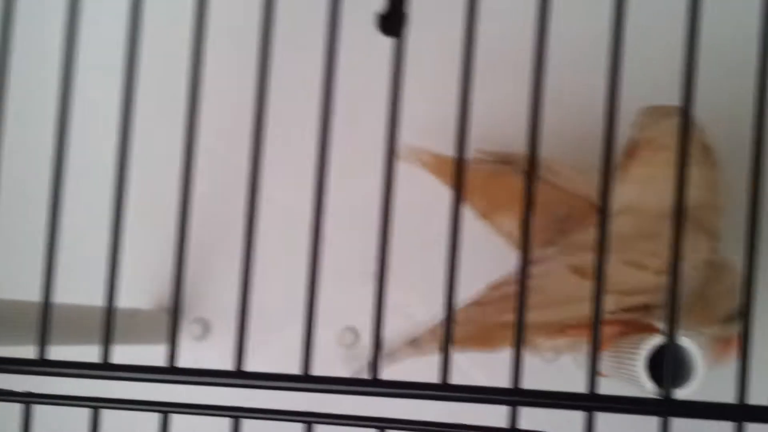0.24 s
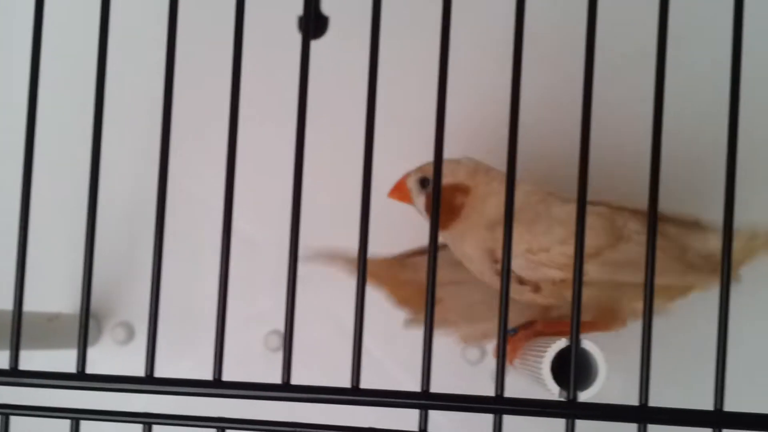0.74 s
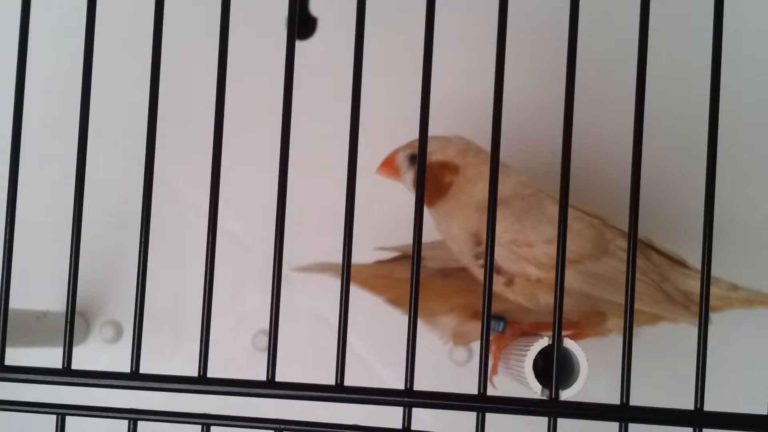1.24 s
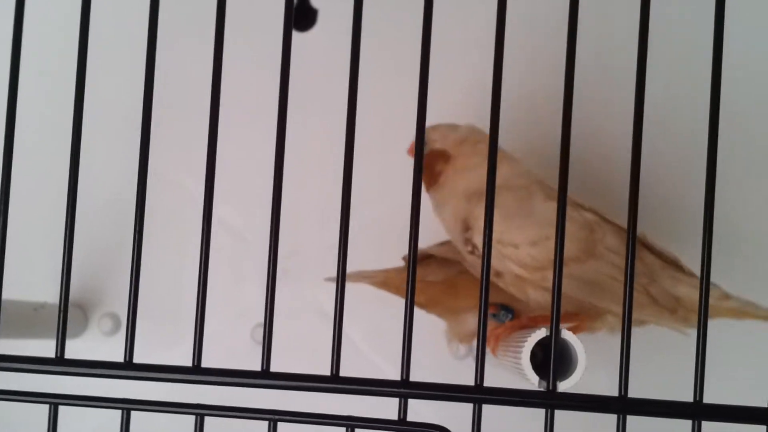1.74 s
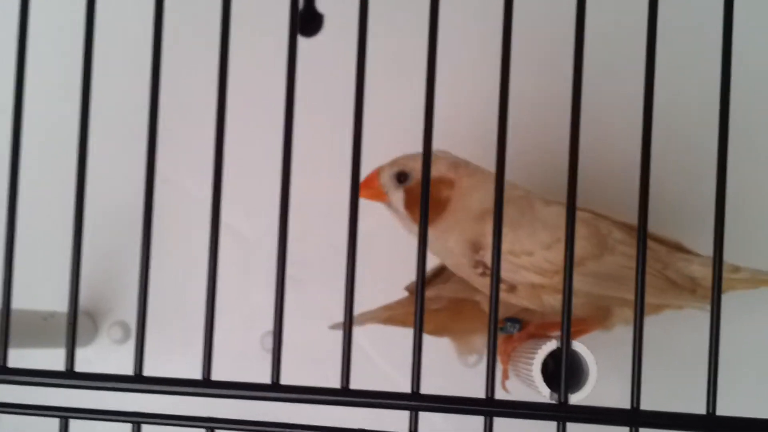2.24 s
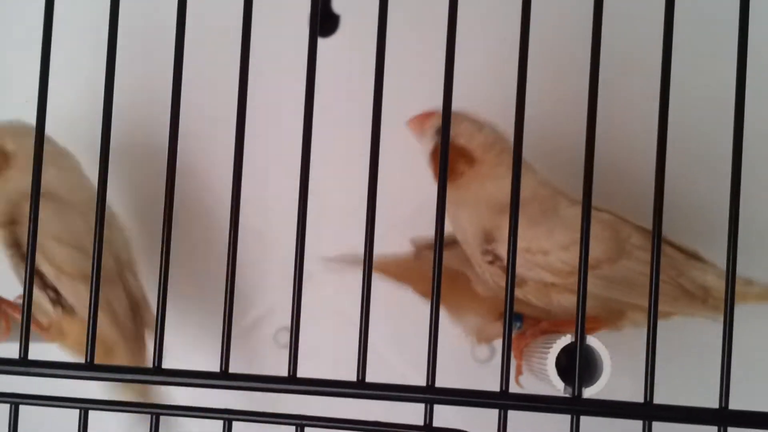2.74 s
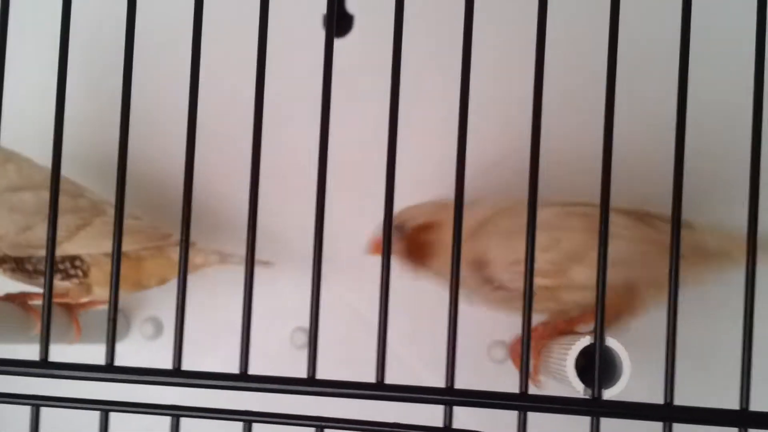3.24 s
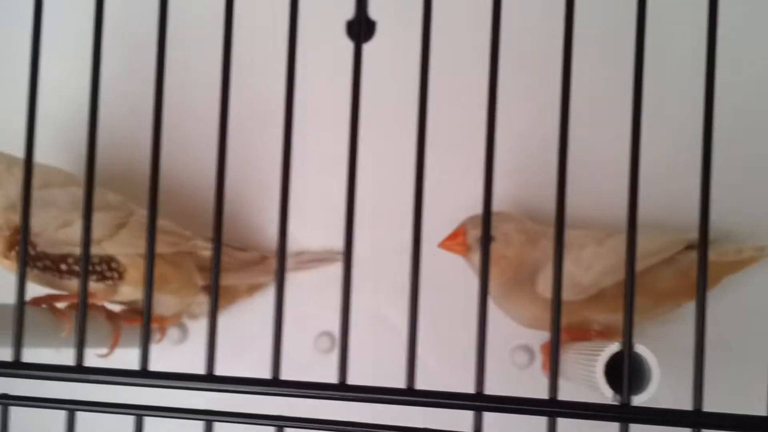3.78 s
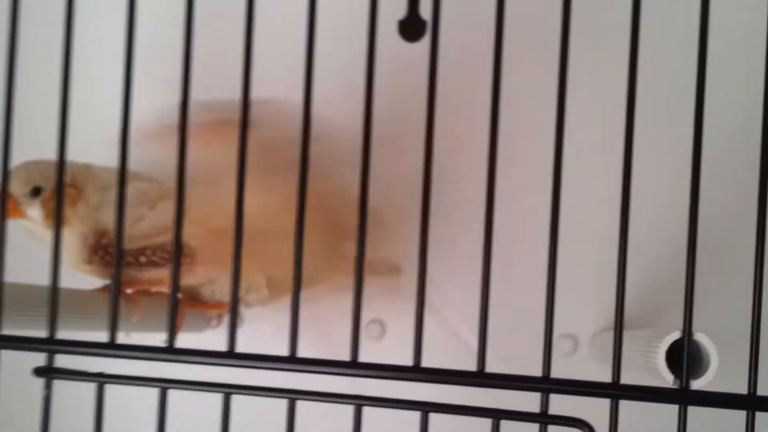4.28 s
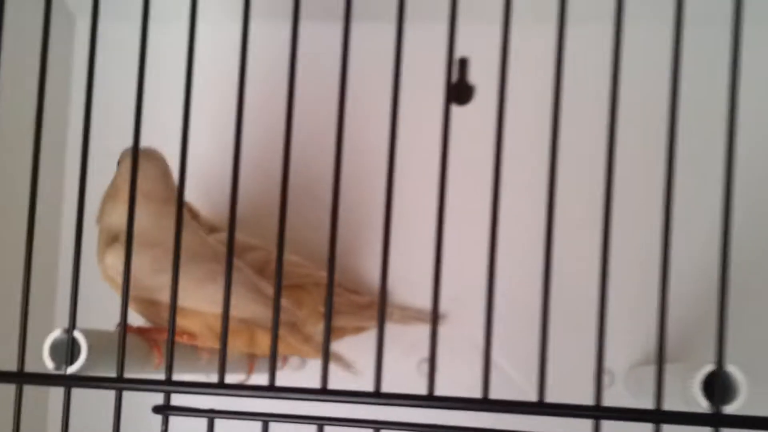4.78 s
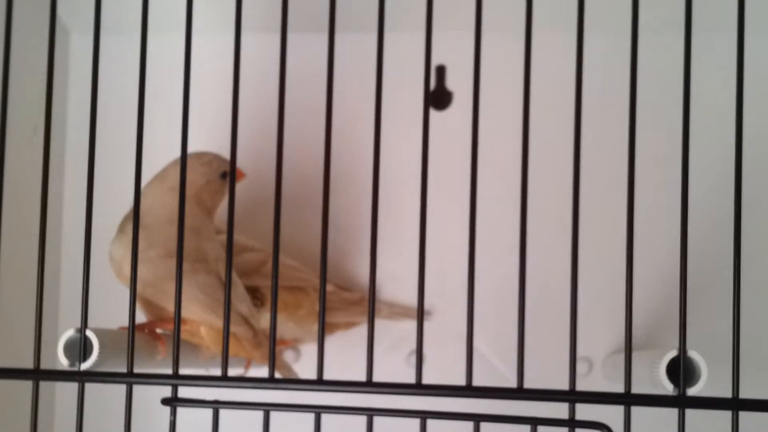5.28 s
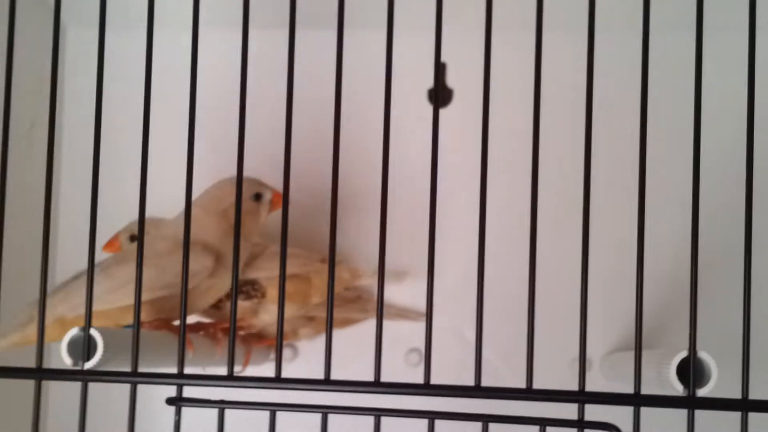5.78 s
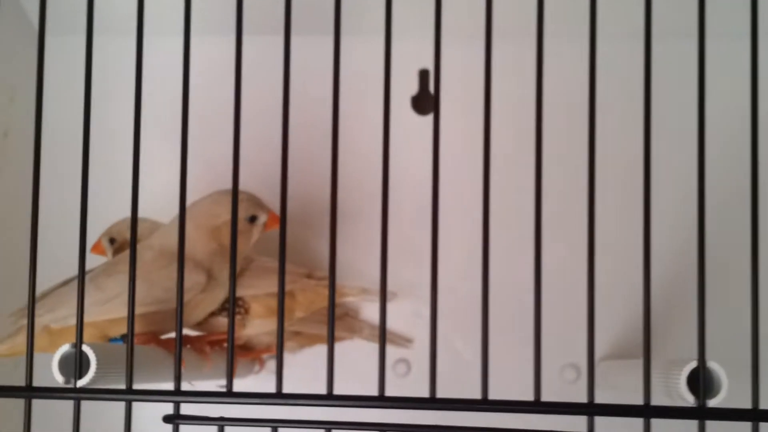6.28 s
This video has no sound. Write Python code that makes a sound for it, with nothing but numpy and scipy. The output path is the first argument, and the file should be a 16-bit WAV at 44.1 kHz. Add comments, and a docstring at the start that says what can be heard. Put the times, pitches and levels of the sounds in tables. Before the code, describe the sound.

Small finches trade buzzy nasal calls and short high chirps in a wire cage indoors, ending with a run of louder, purer chirps.

```python
"""A wire cage of zebra finches in a small room, the microphone close to the birds.
From the start an appliance hums low under the room's rush, while hops bump the perches and claws tick the wires.
Nasal harmonic calls and raspy high chirps, each voiced by a modelled syrinx, soon chatter across one another.
A two-part falling yelp breaks in at 1.3 s; another follows at 4.4 s, as a bird lands with a thud.
The strongest chirps come after 5.4 s, ringing purer than the rest."""
import sys
import numpy as np
from scipy import signal
from scipy.fft import rfft, irfft, next_fast_len
from scipy.io import wavfile
from scipy.ndimage import map_coordinates

SR = 44100
rng = np.random.default_rng(int(sys.argv[2]) if len(sys.argv) > 2 else 0)


def bounce(signal):
    """Save signal as a 16-bit WAV file at the path given by the first command-line argument."""
    frames = np.transpose(np.atleast_2d(signal))
    limited = np.clip(frames, -1, 1)
    pcm = np.round(limited * 32767).astype(np.int16)
    wavfile.write(sys.argv[1], SR, pcm)


N = 287532


def amp(db):
    """Decibels to gain."""
    return 10 ** (np.asarray(db) / 20)


def unit(x):
    """Scale to rms 1."""
    return x / np.sqrt(np.mean(x ** 2) + 1e-20)


def along(points, hz):
    """Read (Hz, value) points on a log axis."""
    point_hz, values = np.transpose(points)
    return np.interp(np.log(hz + 1), np.log(point_hz + 1), values)


def clock(length):
    """Sample times over a length in seconds."""
    return np.arange(int(length * SR)) / SR


def wobble(rate, t):
    """A smooth random curve over the times t, rate knots a second."""
    knots = rng.standard_normal(int(t[-1] * rate) + 4)
    return map_coordinates(knots, [t * rate + 1])


def cycles(hz):
    """Running phase in radians of a changing frequency."""
    return 2 * np.pi * np.cumsum(hz) / SR


def filtered(x, gain):
    """x through a gain that depends on frequency."""
    size = next_fast_len(len(x) + 2048)
    spectrum = rfft(x, size) * gain(np.fft.rfftfreq(size, 1 / SR))
    return irfft(spectrum, size)[:len(x)]


def coloured(x, points, tilt_db=0):
    """x through a (Hz, dB) spectrum, tilted by dB per octave above 2 kHz, at rms 1."""
    def gain(hz):
        octaves = np.log2(np.maximum(hz / 2000, 1))
        return amp(along(points, hz) + tilt_db * octaves)
    return unit(filtered(x, gain))


def swell(t, rise, fall):
    """Smooth opening and closing of a sound, over rise and fall seconds."""
    opening = np.sin(np.pi / 2 * np.clip(t / rise, 0, 1)) ** 2
    closing = np.sin(np.pi / 2 * np.clip((t[-1] - t) / fall, 0, 1)) ** 2
    return opening * closing


def arch(u, first, top, last, crest):
    """Pitch climbs to its top, reached at the share crest of the call, and sags again."""
    climb = (first - top) * np.clip(1 - u / crest, 0, 1) ** 2
    sag = (last - top) * np.clip((u - crest) / (1 - crest), 0, 1) ** 2
    return top + climb + sag


def add(track, s, x):
    """Mix x into the track at time s."""
    part = track[max(round(s * SR), 0):][:len(x)]
    part += x[:len(part)]


def ring(modes, t, spread_db):
    """Damped modes, struck at new strengths each time."""
    total = 0
    for hz, db, t60 in modes:
        strength = amp(db + spread_db * rng.standard_normal() - 60 * t / t60)
        total = total + strength * np.sin(2 * np.pi * (hz * t + rng.random()))
    return total


# how long the small room rings: (frequency [Hz], t60 [s])
ROOM = [(300, 0.7), (2500, 0.23), (6000, 0.14), (11000, 0.51)]


def room(x, near_db, far_db, near_t60=0.11):
    """Direct sound, quick echoes off the wall behind the cage and the room's tail, new for each sound."""
    t = clock(.35)
    hz, lag, z = signal.stft(rng.standard_normal(len(t)), SR, nperseg=256)
    decay = amp(-60 * lag / along(ROOM, hz)[:, None])
    tail = signal.istft(z * decay, SR, nperseg=256)[1][:len(t)] * (t > .006)
    sparse = rng.standard_normal(len(t)) * (rng.random(len(t)) < .02)
    near = sparse * amp(-60 * t / near_t60) * (t > .001)
    echoes = amp(near_db) * near / np.linalg.norm(near) + amp(far_db) * tail / np.linalg.norm(tail)
    echoes[0] = 1  # straight from source to microphone
    return signal.fftconvolve(x, echoes / np.linalg.norm(echoes))


# hum of the appliance: (time [s], fundamental level [dB], second harmonic level [dB])
HUM = [(0, -53, -65), (1, -52, -50.5), (2, -56, -56.5), (2.801, -49, -48), (3.7, -46, -50),
       (4.4, -52.5, -56.5), (4.9, -57, -46.5), (6.5, -49.5, -52.5)]


def appliance_hum(hum_hz=39.4):
    """Four harmonics of a low hum, wavering together in pitch and each in level and phase."""
    t = np.arange(N) / SR
    s, first_db, second_db = np.transpose(HUM)
    levels = [np.interp(t, s, first_db), np.interp(t, s, second_db), -56, -63]
    phase = cycles(hum_hz * (1 + 0.017 * wobble(1.3, t)))
    hum = np.zeros(N)
    for k, db in enumerate(levels, 1):
        hum += amp(db + 1.3 * wobble(5, t)) * unit(np.sin(k * phase + .5 * wobble(9, t)))
    return hum


# spectrum of the room's soft rush: (frequency [Hz], relative level [dB per Hz])
AIR = [(12, -25), (20, -25), (99, -2.5), (225, -9.5), (486, -11), (555, -13.5), (1080, -17), (1990, -24),
       (2740, -29.5), (3870, -29), (6080, -24), (11500, -33), (15000, -88), (22000, -120)]


def room_rush():
    """Coloured noise for the air of the room, drifting slightly in level."""
    drift = amp(.9 * wobble(3, np.arange(N) / SR))
    return amp(-49) * drift * coloured(rng.standard_normal(N), AIR)


# soft bumps on perch and cage floor: (time [s], relative level [dB])
BUMPS = [(0.323, -31), (0.708, -28), (0.981, -29), (1.18, -32.5), (1.485, -36), (1.771, -27), (2.665, -28),
         (3.163, -30), (3.222, -33), (3.434, -24), (4.217, -32), (4.314, -28.5), (5.578, -25.5),
         (5.641, -26.5)]
# ringing modes of a perch: (frequency [Hz], relative level [dB], t60 [s])
PERCH = [(285.4, -9.5, 0.44), (336.3, -2.5, 0.34), (382, 3, 0.12), (449.6, 3, .15)]


def perch_bumps():
    """Feet set the perch modes ringing, with a soft onset."""
    out, t = np.zeros(N), clock(0.36)
    for s, db in BUMPS:
        contact = 1 - np.exp(-t / 0.0042)
        add(out, s, amp(db - 9.5) * ring(PERCH, t, spread_db=2) * contact)
    return out


# claws and beaks on the cage: (time [s], tray knock level [dB], wire tick level [dB])
TAPS = [(.014, -40.5, -28), (.123, -50, -36.5), (.982, -23.5, -32), (1.177, -36.5, -23), (1.481, -44, -26),
        (1.768, -35, -39.5), (2.699, -34, -37), (3.115, -37, -26), (3.365, -45, -38), (3.416, -37.5, -32.5),
        (4.158, -43, -60), (4.313, -36.5, -38), (4.423, -39, -59)]
# ringing modes of the plastic tray: (frequency [Hz], relative level [dB], t60 [s])
TRAY = [(282, -10.5, 0.59), (600, -9, 0.082), (1270, -3, 0.06), (1517, -17.5, 0.065), (1935, -8.5, 0.059)]
# colour of the wire ticks: (frequency [Hz], relative level [dB])
WIRES = [(800, -7), (2000, -4), (3500, -3), (6200, 3), (9000, -11.5), (12000, -13)]


def cage_taps():
    """Claws rattle on the wires as decaying noise and knock the plastic tray's damped modes."""
    out, t = np.zeros(N), clock(0.36)
    for s, knock_db, tick_db in TAPS:
        # a claw skids and catches several times
        chatter = amp(2.5 * wobble(350, t))
        tick = coloured(rng.standard_normal(len(t)), WIRES) * chatter * amp(-60 * t / 0.11)
        dull = [(250, -9), (1400, -4), (2300, -13), (5000, -60)]  # (frequency [Hz], level [dB])
        thud = coloured(rng.standard_normal(len(t)), dull) * amp(-60 * t / 0.17)
        knock = 1.32 * ring(TRAY, t, spread_db=1.5) + .5 * thud
        contact = 1 - np.exp(-t / .005)
        tap = (amp(tick_db) * tick + amp(knock_db) * knock) * contact
        add(out, s, room(tap, near_db=-18.5, far_db=-10.5))
    return out


LANDING_S = 4.421
# thud of a bird landing: (frequency [Hz], level [dB], t60 [s])
LANDING = (257, -23, 0.057)


def landing():
    """One damped low mode: a bird's weight meeting the cage."""
    out, t = np.zeros(N), clock(0.36)
    hz, db, t60 = LANDING
    add(out, LANDING_S, amp(db) * np.sin(2 * np.pi * hz * t) * amp(-60 * t / t60))
    return out


def syrinx(pitch, rough, t, flicker_db=3):
    """One puff a cycle; roughness unsettles pitch and size and lets air hiss through each opening."""
    jitter, shimmer_db, smear = .035, 6, 0.23
    phase = cycles(pitch * (1 + jitter * rough * wobble(356.5, t)))
    # the airway smears each puff in time, and the overtones flicker as beak and head move
    puffs = np.zeros(len(t))
    for k in range(1, 23):
        flicker = amp(flicker_db * wobble(40, t))
        puffs += flicker * np.cos(k * phase - smear * k * k + 0.29 * wobble(58.2, t))
    hiss = unit(rng.standard_normal(len(t)) * (1 + 0.55 * np.cos(phase)))
    return unit(puffs) * amp(shimmer_db * rough * wobble(311, t)) + rough * hiss


# first and last pitch over the top pitch; share of the call spent climbing
NASAL_FIRST, NASAL_LAST, NASAL_CREST = .88, .93, .46
# roughness 0-1 once settled, extra at the start, time to settle [s]
NASAL_ROUGH, HOARSE_ONSET, HOARSE_S = .17, .38, .025
# middle over ends [dB]; share of the call spent swelling; release [s]
NASAL_ARCH_DB, NASAL_RISE, NASAL_RELEASE_S = 4.1, .12, .019
# nasal calls: (start [s], length [s], top pitch [Hz], relative level [dB], beak opening as brightness [dB])
NASAL = [(.056, .074, 566, -34.5, -8.5), (.635, .086, 574, -32, -8), (.892, .08, 531, -34.5, -2.5),
         (1.17, .097, 569, -27, -5), (1.233, .125, 619, -22, 1.5), (1.595, .133, 538, -32.5, 1),
         (1.797, .112, 552, -35.5, 3.5), (2.09, .18, 617, -23.5, 1), (3.03, .07, 520, -50, -6),
         (3.23, .075, 547, -38.5, -6), (3.742, .074, 529, -33, -8.5), (3.922, .145, 613, -22.5, 0),
         (3.994, .098, 596, -20.5, -2.5), (4.51, .195, 589, -25, -.5), (4.675, .105, 536, -36.5, -1.5),
         (4.977, .112, 549, -42, -7), (5.247, .1, 535, -36.5, -3.5), (5.403, .105, 587, -28, 6),
         (5.586, .185, 614, -21.5, 2), (5.768, .12, 589, -31.5, 3.5), (6.09, .2, 613, -26, 1),
         (6.42, .165, 587, -36, 4)]
# throat and beak in a nasal call: (frequency [Hz], relative level [dB])
NASAL_THROAT = [(550, -29.5), (1150, -18), (1750, -18.5), (2350, -11.5), (3000, 0), (3600, -4.5), (4200, 1),
                (4900, -7.5), (5800, -12), (7500, -23), (10000, -24.5), (12000, -47)]


def nasal_calls():
    """Buzzy harmonic calls on one shallow arch of pitch, hoarse as the voice starts, then cleaner."""
    out = np.zeros(N)
    for s, length, top, db, bright_db in NASAL:
        t = clock(length)
        u = t / length
        unsteady = 1 + .0034 * wobble(69.4, t)
        pitch = top * arch(u, NASAL_FIRST, 1, NASAL_LAST, NASAL_CREST) * unsteady
        hoarse = NASAL_ROUGH + HOARSE_ONSET * np.exp(-t / HOARSE_S)
        throat = np.array(NASAL_THROAT) * [2 ** (bright_db / 40), 1]  # a closing beak lowers the resonances
        voice = coloured(syrinx(pitch, hoarse, t), throat, bright_db / 2)
        effort = swell(t, NASAL_RISE * length, NASAL_RELEASE_S) * amp(-NASAL_ARCH_DB * (2 * u - 1) ** 2)
        add(out, s, room(amp(db + .5) * voice * effort, near_db=-1.5, far_db=-19))
    return out


# high note held [s]; time [s], pitch [Hz] and level [dB] of the fall
YELP_HOLD_S, TUMBLE_S, TUMBLE_HZ, TUMBLE_DB = .011, .042, 440, 12
# yelps: (start [s], top pitch [Hz], level [dB], beak opening as brightness [dB per octave])
YELPS = [(1.308, 943, -10.5, -.5), (4.424, 918, -12, 3.5)]
# the two syllables of every yelp: (delay [s], length [s])
SYLLABLES = [(0, .052), (.053, .084)]
# throat and beak in a yelp: (frequency [Hz], relative level [dB])
YELP_THROAT = [(500, -30.5), (900, -21), (1800, -21.5), (2700, -11.5), (3650, -0.5), (4500, -7.5),
               (5400, -4), (6400, -21), (8000, -32.5), (12000, -41)]


def yelps():
    """Each syllable holds a high loud pitch, then tumbles, weaker and rougher; the longer falls further."""
    out = np.zeros(N)
    for s, top, db, bright_db in YELPS:
        for delay, length in SYLLABLES:
            t = clock(length)
            tumble = 1 - np.exp(-(np.maximum(t - YELP_HOLD_S, 0) / TUMBLE_S) ** 1.3)
            scoop = 1 - .052 * np.exp(-t / .004)  # starts slightly flat
            pitch = (top - TUMBLE_HZ * tumble) * scoop
            voice = coloured(syrinx(pitch, .13 + .067 * tumble, t, flicker_db=4), YELP_THROAT, bright_db)
            effort = swell(t, rise=.0094, fall=.012) * amp(-TUMBLE_DB * tumble ** .4)
            add(out, s + delay, room(amp(db) * voice * effort, near_db=-4, far_db=-13))
    return out


# top pitch of a full chirp [Hz]; one clipped short stays higher by up to this share; length scale [s]
CHIRP_HZ, CLIPPED_LIFT, CLIPPED_S = 2900, .38, .043
# first and last pitch over the top; share of the call spent climbing; share of pitch lost in the slide
CHIRP_FIRST, CHIRP_LAST, CHIRP_CREST, CHIRP_SLIDE = .86, .96, .36, .125
# middle over ends [dB]; attack [s]; release [s]
CHIRP_ARCH_DB, CHIRP_RISE_S, CHIRP_RELEASE_S = 16, .018, .006
# rasp 0-1 at this table level [dB]: a chirp pushed harder is purer
RASP, RASP_AT_DB, CLEARS_PER_DB = .8, -25, .012
# share of the rasp added at the start, share that stays; time until the tone clears [s]
SHRED_ONSET, SHRED_SETTLED, CLEAR_S = .85, .5, .032
# chirps: (start [s], length [s], relative level [dB], second harmonic over the first [dB])
CHIRPS = [(.225, .078, -26.5, -1), (.591, .08, -25.5, 1.5), (1.124, .038, -42, -9), (1.486, .066, -27, 3.5),
          (1.526, .068, -27.5, 4.5), (1.874, .052, -34.5, -10), (1.939, .072, -23.5, -5.5),
          (2.259, .029, -23.5, -3.5), (2.455, .083, -23, -2.5), (2.549, .058, -37, -9),
          (2.913, .05, -30, -4.5), (3.265, .052, -25, -7), (3.879, .061, -24.5, 6.5),
          (4.566, .062, -27, -19), (4.807, .053, -32, -8.5), (5.014, .06, -32.5, 7),
          (5.089, .054, -34.5, -9), (5.348, .064, -32.5, -3.5), (5.464, .072, -12.5, 11.5),
          (5.692, .063, -16, 6.5), (5.906, .098, -12.5, 12.5), (6.052, .037, -22, -6.5),
          (6.238, .084, -9.5, 13)]
# throat and beak in a chirp: (frequency [Hz], relative level [dB])
CHIRP_THROAT = [(500, -14), (1300, 0), (2000, -9.5), (2700, -1.5), (4200, 4), (5500, 2), (6500, -6),
                (8500, -4.5), (10500, -9), (12000, -18.5)]


def chirps(flutter_hz=800, flutter_depth=1.0, third_db=-14, fourth_db=-17):
    """A high tone leaps and slides down; the syrinx's other side flutters and shreds it into sidebands."""
    out = np.zeros(N)
    for s, length, db, second_db in CHIRPS:
        t = clock(length)
        u = t / length
        top = CHIRP_HZ * (1 + CLIPPED_LIFT * np.exp(-(length / CLIPPED_S) ** 2))
        rasp = np.clip(RASP - CLEARS_PER_DB * (db - RASP_AT_DB), 0, 1)
        slide = .5 + .5 * np.tanh((u - .52) / .12)
        # shrill chirps hold their pitch better
        sag = (CHIRP_SLIDE - .005 * second_db) * slide
        # the tone clears as it slides down
        shred = rasp * (SHRED_SETTLED + SHRED_ONSET / (1 + (t / CLEAR_S) ** 5))
        unsteady = 1 + .015 * wobble(130, t) + .09 * shred * wobble(1800, t)
        air = .18 * shred * rng.standard_normal(len(t))
        flutter = cycles(flutter_hz * (1 + 0.26 * wobble(219.8, t)))
        pitch = top * (arch(u, CHIRP_FIRST, 1, CHIRP_LAST, CHIRP_CREST) - sag) * unsteady
        phase = cycles(pitch) + 0.22 * shred * np.sin(flutter)
        levels = [0, second_db, third_db + second_db / 2, fourth_db + second_db / 2]
        tone = sum(amp(level) * np.sin(k * phase) for k, level in enumerate(levels, 1))
        gate = unit(np.exp(2 * flutter_depth * shred * (np.cos(flutter) - shred / 2)))
        voice = coloured((unit(tone) + air) * gate, CHIRP_THROAT)
        effort = swell(t, CHIRP_RISE_S, CHIRP_RELEASE_S) * amp(-CHIRP_ARCH_DB * (2 * u - 1) ** 2)
        add(out, s, room(amp(db + 2) * voice * effort, near_db=-2, far_db=-8))
    return out


def scene():
    """The room, the cage and its birds, in mono."""
    background = appliance_hum() + room_rush()
    cage = perch_bumps() + cage_taps() + landing()
    birds = nasal_calls() + yelps() + chirps()
    return (background + cage + birds)[None]


TOP_HZ = 11850  # band limit


def record(dry):
    """The recorder rounds off the loudest peaks and keeps nothing above its band limit."""
    rounded = dry[0] / (1 + np.abs(dry[0] / .75) ** 6) ** (1 / 6)
    return filtered(rounded, lambda hz: hz < TOP_HZ)[None]


dry = scene()
out = record(dry)
bounce(out)
```